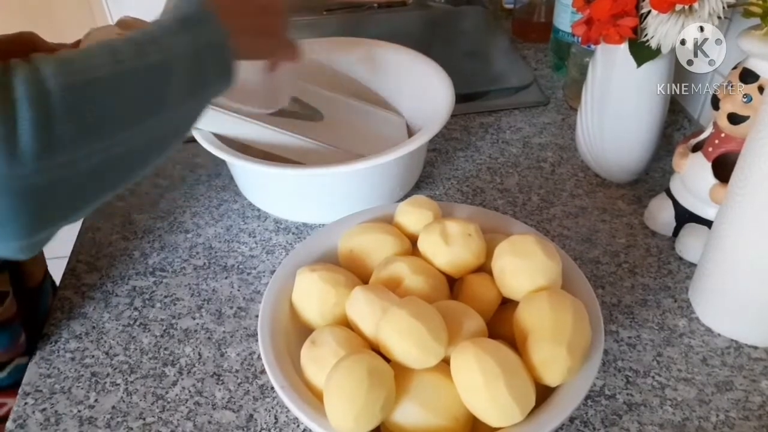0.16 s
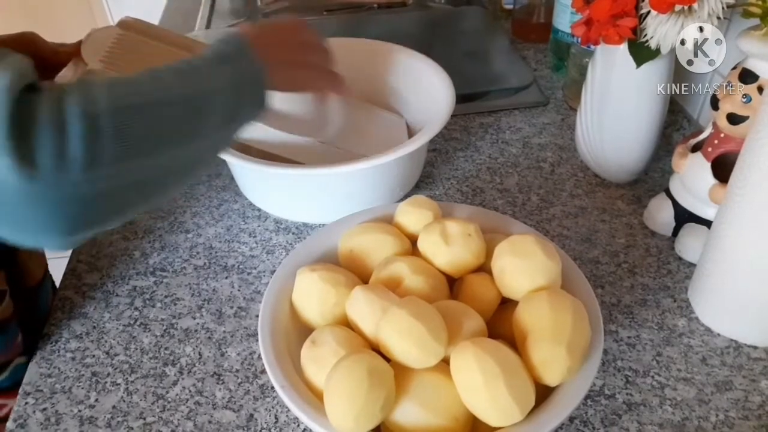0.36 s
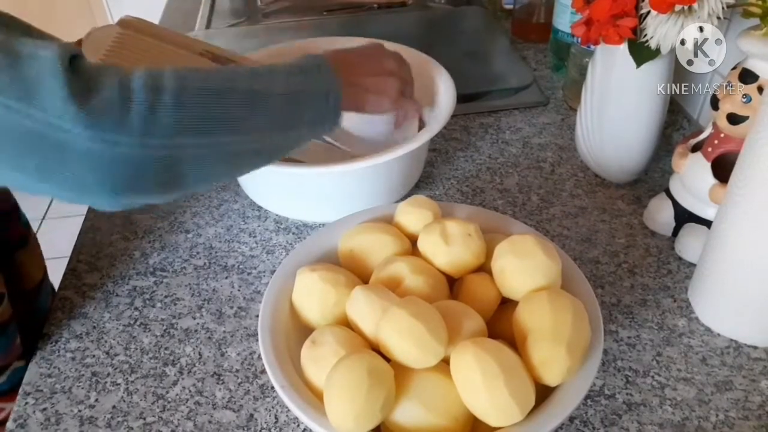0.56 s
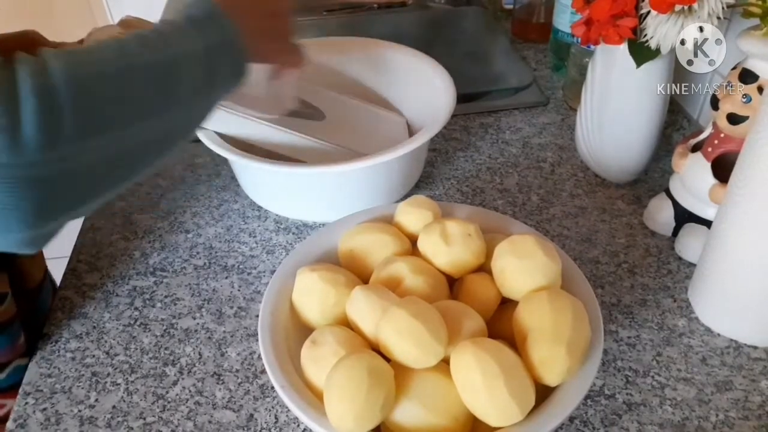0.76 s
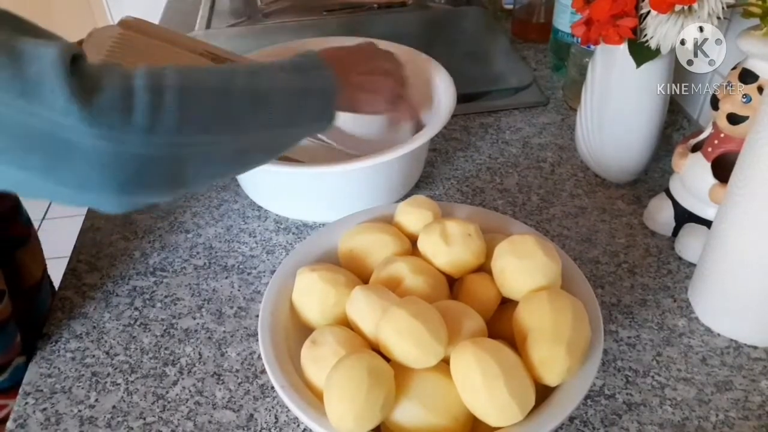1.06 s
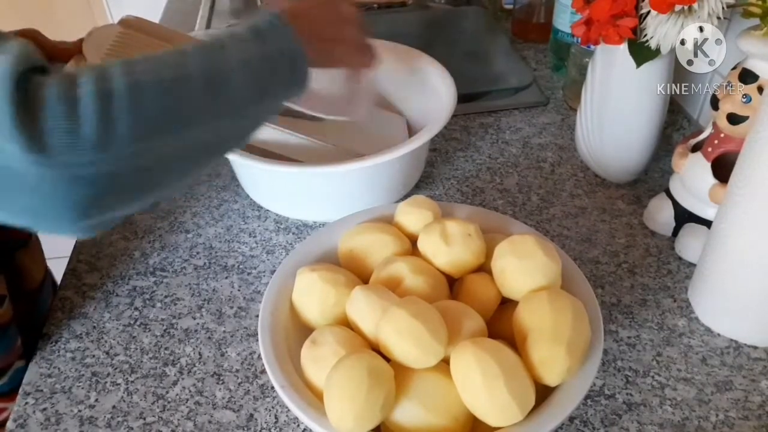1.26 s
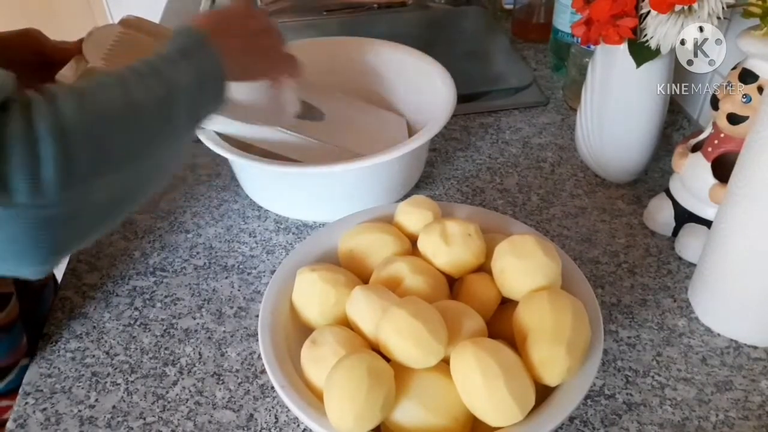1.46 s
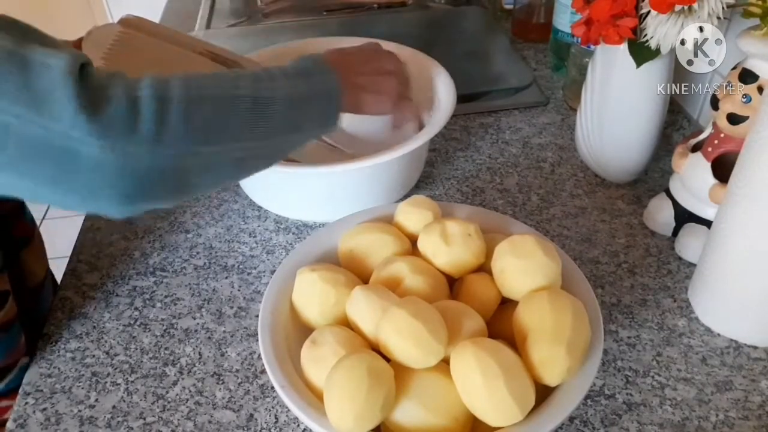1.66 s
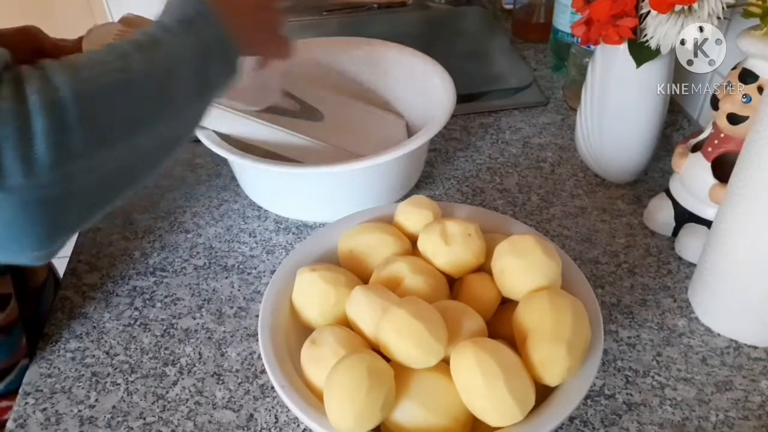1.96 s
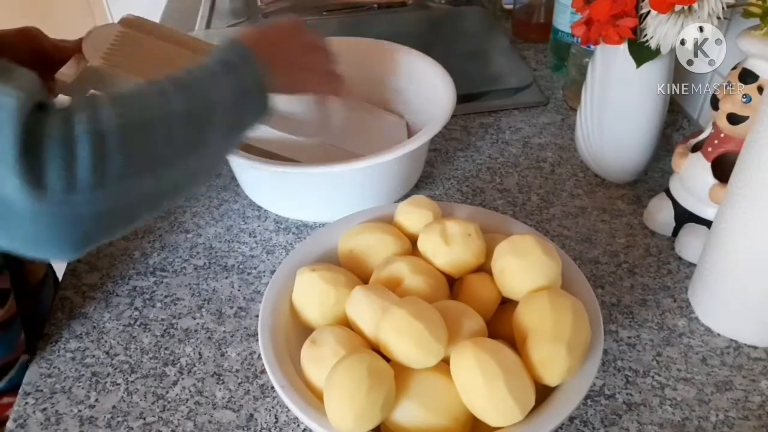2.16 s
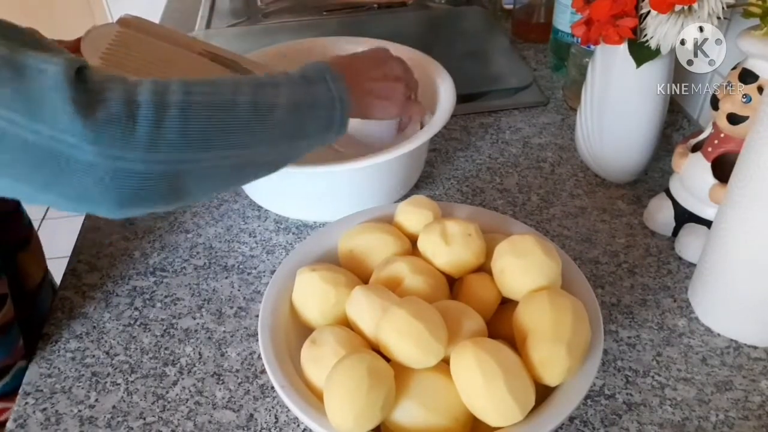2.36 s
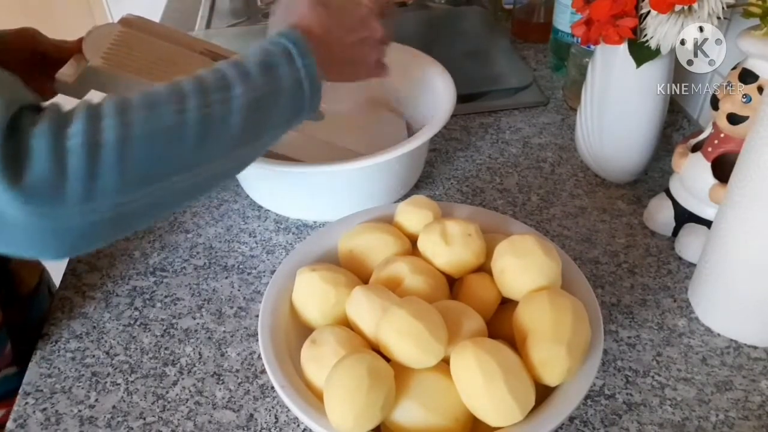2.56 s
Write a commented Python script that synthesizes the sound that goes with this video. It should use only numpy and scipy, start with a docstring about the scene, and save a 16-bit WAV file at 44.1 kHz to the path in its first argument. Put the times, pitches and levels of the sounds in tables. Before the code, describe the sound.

A potato is sliced on a wooden slicer in a small kitchen. Each of four strokes starts with a crisp crunch, hisses wetly and ends in a hollow knock. Soft low bumps and light rubs fall between, heard from nearby.

```python
"""A small kitchen: a potato is pushed four times over a wooden slicer resting in a plastic bowl.
On each stroke the blade bites with a crunch, the board judders, the wet slice hisses over the blade,
and the stop gives a hollow knock. Soft, low bumps boom briefly in the room. The potato is
drawn back with a light rub, the last time with a squeak. Faint room tone lies under it all."""
import sys
import numpy as np
from scipy import signal
from scipy.fft import rfft, irfft, next_fast_len
from scipy.io import wavfile
from scipy.ndimage import uniform_filter1d

SR = 44100
rng = np.random.default_rng(int(sys.argv[2]) if len(sys.argv) > 2 else 0)


def transcribe(signal):
    """Save signal, clipped to [-1, 1], as a 16-bit WAV file at the path in sys.argv[1]."""
    frames = np.atleast_2d(signal).T
    limited = np.clip(frames, -1, 1)
    pcm = np.round(limited * 32767).astype(np.int16)
    wavfile.write(sys.argv[1], SR, pcm)


N = 119070
T = np.arange(N) / SR
GRAINS_PER_S, SLIPS_PER_S = 9900, 1800  # fine crackle, coarser stick-slip


def amp(db):
    """Decibels to gain."""
    return 10 ** (np.asarray(db) / 20)


def unit(x):
    """x scaled to rms 1."""
    return x / np.sqrt(np.mean(x ** 2) + 1e-20)


def along(points, hz):
    """A curve of (frequency, value) points, read at hz on a log axis."""
    f, v = np.transpose(points)
    return np.interp(np.log(hz + 1), np.log(f + 1), v)


def filtered(x, response):
    """x through a complex frequency response."""
    size = 2 * next_fast_len(N)
    return irfft(rfft(x, size) * response(np.fft.rfftfreq(size, 1 / SR)), size)[..., :N]


def causal(db, hz):
    """The minimum-phase response with a gain of db at the frequencies hz."""
    cepstrum = irfft(np.log(amp(db)) * np.ones_like(hz))
    half = len(cepstrum) // 2
    cepstrum[1:half] *= 2
    cepstrum[half + 1:] = 0
    return np.exp(rfft(cepstrum))


def colour(x, eq):
    """x through an EQ curve, with make-up gain that holds the power of white noise."""
    rms_gain = np.sqrt(np.mean(amp(along(eq, np.linspace(0, SR / 2, N))) ** 2))
    return filtered(x, lambda hz: causal(along(eq, hz), hz)) / rms_gain


def resonate(x, peaks):
    """x through a resonator bank of alternating polarity that holds the power of white noise."""
    def response(f):
        bank = sum((-1) ** k * amp(db) * 1j * f * width / (hz * hz - f * f + 1j * f * width)
                   for k, (hz, width, db) in enumerate(peaks))
        return bank / np.sqrt(np.mean(abs(bank) ** 2))
    return filtered(x, response)


def grains(rate, spread_db):
    """Crackle: tiny random clicks of uneven size, rms 1."""
    clicks = (rng.random(N) < rate / SR) * np.sign(rng.standard_normal(N))
    return unit(clicks * amp(spread_db * (2 * rng.random(N) - 1)))


def gate(start, length, attack_s, release_s):
    """Attack, hold, exponential release."""
    attack = np.clip((T - start) / attack_s, 0, 1)
    return attack * np.exp(-np.maximum(T - start - length, 0) / release_s)


def arch(start, length, power):
    """Speed of the hand: it swells and falls over one movement."""
    return np.maximum(np.sin(np.pi * np.clip((T - start) / length, 0, 1)), 1e-9) ** power


def ring(start, modes, rise_s, spread_db=1):
    """Modes struck together, their balance a little different on each hit."""
    t = np.maximum(T - start, 0)[:, None][T < start + .5]
    hz, db, t60 = np.transpose(modes)
    decay = amp(db + spread_db * rng.standard_normal(len(hz)) - 60 * t / t60)
    attack = 1 - np.exp(-(t / rise_s) ** 2)
    partials = decay * np.sin(2 * np.pi * hz * t) * attack
    return np.pad(partials.sum(axis=1), (0, N - len(t)))


# reverb time of the kitchen (frequency [Hz], t60 [s])
ROOM_DECAY = [(100, 0.31), (300, 0.31), (800, 0.31), (2000, 0.3), (5000, 0.3), (14000, 0.22)]
# stereo image of the reverb (frequency [Hz], left-right correlation [0 to 1])
ROOM_IMAGE = [(100, 0.94), (200, 0.96), (350, 0.058), (600, .3), (1000, 0), (2500, 0), (12000, 0.11)]
def reflections(rise_s=0.0021):
    """The short tail off hard walls: near mono in the bass, wide in the treble."""
    hz, t, noise = signal.stft(rng.standard_normal((2, SR // 2)), SR, nperseg=256)
    width = np.arccos(np.clip(along(ROOM_IMAGE, hz), -1, 1))[:, None] / 2
    tail = noise * amp(-60 * t / along(ROOM_DECAY, hz)[:, None]) * (1 - np.exp(-t / rise_s))
    mid, side = signal.istft(tail * np.array([np.cos(width), np.sin(width)]), SR, nperseg=256)[1]
    return np.array([mid + side, mid - side]) / np.linalg.norm(mid + side)


def kitchen(x, wet_db, scatter=0, scatter_decay_s=0.0036, scatter_above_hz=2600):
    """Direct sound, treble scattered by bowl and counter, and the room's tail."""
    sides = np.array([[.5], [-.5]])
    pan_db, lead_s = -1.5, .00004  # left relative to right
    y = filtered(x, lambda f: amp(sides * pan_db) * np.exp(2j * np.pi * f * lead_s * sides))
    highpass = signal.butter(2, scatter_above_hz, 'high', fs=SR, output='sos')
    # the hand moves, so each stroke meets other reflections
    edges = [0] + [s + .2 for s, _, _ in KNOCKS[:-1]] + [N / SR]
    for start, end in zip(edges, edges[1:]):
        tail = amp(wet_db) * reflections()
        burst = rng.standard_normal(tail.shape) * np.exp(-T[:tail.shape[1]] / scatter_decay_s)
        early = signal.sosfilt(highpass, burst)
        tail += scatter * early / np.linalg.norm(early, axis=1, keepdims=True)
        first = int(start * SR)
        wet = signal.fftconvolve(x[None, first:int(end * SR)], tail, axes=1)[:, :N - first]
        y[:, first:first + wet.shape[1]] += wet
    return y / np.hypot(1, amp(wet_db))


# EQ of the room tone (frequency [Hz], relative level [dB])
ROOM_TONE_EQ = [(25, -7), (60, 1.5), (180, 0.5), (400, -4), (1000, -11), (3000, -16.5), (7000, -12.5),
                (15000, -10)]
def room_tone():
    """A faint, steady bed of low rumble and air."""
    return amp(-72.5) * kitchen(colour(rng.standard_normal(N), ROOM_TONE_EQ), wet_db=-7)


# a low ring dying away at the start, then soft, low bumps (time [s], level [dB])
BUMPS = [(0, -33), (0.363, -36.5), (0.536, -26.5), (.586, -37), (0.679, -43.5), (1.116, -24),
         (1.165, -32.5), (1.512, -39.5), (1.709, -28.5), (2.152, -28.5), (2.328, -26.5), (2.353, -36),
         (2.397, -29)]
# low ring of the room (frequency [Hz], level [dB], t60 [s])
ROOM_MODES = [(103.3, -4, 0.18), (172, -14, 0.081), (190.9, 0, 0.2), (230.3, -3.5, 0.12), (332, 1.5, 0.088),
              (383, -1.5, .1), (455, -7.5, .15), (603, -8, 0.13), (743.4, -16.5, 0.17)]
def low_bumps():
    """Soft, low bumps boom briefly in the room."""
    bumps = sum(amp(db) * ring(s, ROOM_MODES, rise_s=0.0023) for s, db in BUMPS)
    return kitchen(bumps, wet_db=-4)


# back strokes (time [s], length [s], level [dB])
BACK_STROKES = [(0, 0.032, -57), (0.077, 0.22, -67.5), (0.64, 0.35, -55), (1.869, 0.093, -84),
                (2.368, 0.043, -46.5)]
# EQ of the soft rub (frequency [Hz], relative level [dB])
RUB_EQ = [(200, 7), (1500, -1.5), (3000, -6.5), (5500, -7), (9000, -7.5), (15000, -13.5)]
def back_rubs():
    """The potato rubs lightly over the board on its way back."""
    swell = sum(amp(db) * arch(s, length, power=0.34) for s, length, db in BACK_STROKES)
    return kitchen(colour(swell * rng.standard_normal(N), RUB_EQ), wet_db=3.5)


# bites of the blade (time [s], crunch level [dB], snap level [dB], length [s])
BITES = [(0.2103, -30.5, -25, 0.0037), (0.2171, -19.5, -29, 0.0057), (.8085, -30, -32.5, 0.0024),
         (.821, -17, -29, 0.0025), (1.3943, -22.5, -24.5, 0.0044), (2.0154, -25, -29, 0.0065)]
# EQ of the full-bodied crunch (frequency [Hz], relative level [dB])
CRUNCH_EQ = [(100, -7), (500, 11), (1000, 0), (1700, 3.5), (2800, 7), (4500, -2), (7000, -7.5),
             (9000, -8.5), (12000, -8.5), (16000, -17)]
# EQ of the bright snap (frequency [Hz], relative level [dB])
SNAP_EQ = [(500, -22.5), (3000, -2.5), (6000, -6.5), (8700, 2.5), (11500, -5.5), (15500, -5)]
def blade_bites():
    """Crisp cells burst as the blade enters: a bright snap on top of a crunch."""
    crunch_env = sum(amp(db) * gate(s, length, attack_s=.0008, release_s=.003)
                     for s, db, _, length in BITES)
    crunch = colour(crunch_env * grains(GRAINS_PER_S, spread_db=3.5), CRUNCH_EQ)
    roomy_crunch = kitchen(crunch, wet_db=1, scatter=1.0)
    snap_env = sum(amp(db) * gate(s, length, attack_s=0.00033, release_s=0.0013)
                   for s, _, db, length in BITES)
    snap = colour(snap_env * grains(GRAINS_PER_S, spread_db=7.5), SNAP_EQ)
    return roomy_crunch + kitchen(snap, wet_db=-9, scatter=0.69)


# judders as each cut opens (time [s], length [s], level [dB])
JUDDERS = [(0.212, 0.05, -33), (0.817, 0.022, -27.5), (1.391, 0.035, -27.5), (2.018, 0.037, -28.5)]
# body of the wooden board (frequency [Hz], bandwidth [Hz], relative level [dB])
BOARD_BODY = [(52.1, 6.1, -9), (115.6, 13, 6.5), (198, 18, 8), (265.4, 27, -1.5), (342, 42, 4),
              (448, 50, -5), (558, 40, -0.5), (624, 59, 3.5), (759, 40, -3), (1154, 99, -1.5),
              (1342, 89, -13), (2430, 430, -9), (2850, 460, -10), (3670, 400, -15.5)]
# EQ of the tearing potato (frequency [Hz], relative level [dB])
TEAR_EQ = [(200, -3.5), (1000, 0.5), (3000, -2.5), (5000, -7), (9000, -12.5), (15000, -25.5)]
def board_judders():
    """The potato sticks, slips and tears against the blade, shaking the board."""
    force = sum(amp(db) * gate(s, length, attack_s=0.0034, release_s=0.018) for s, length, db in JUDDERS)
    tearing = amp(-8) * colour(force * grains(GRAINS_PER_S, spread_db=12), TEAR_EQ)
    judder = resonate(force * grains(SLIPS_PER_S, spread_db=4.5), BOARD_BODY)
    return kitchen(judder + tearing, wet_db=-2)


# passes of the slice over the blade (time [s], length [s], hiss level [dB], rumble level [dB])
SLIDES = [(0.325, 0.14, -37, -41.5), (0.924, 0.11, -36.5, -41), (1.471, .15, -45.5, -40),
          (2.12, 0.14, -37.5, -37.5)]
# EQ of the wet hiss (frequency [Hz], relative level [dB])
HISS_EQ = [(100, -17), (600, -0.5), (900, 1), (1500, 7), (2200, 2), (3600, 3), (5000, 0.5), (7000, -1),
           (9200, 1), (11000, 0.5), (15500, -1)]
# low resonances of the room (frequency [Hz], bandwidth [Hz], relative level [dB])
RUMBLE_RESONANCES = [(52.7, 9.1, -39), (115.8, 9.1, 6.5), (179.5, 21, 3.5), (264.6, 75, -3), (350, 81, -1),
                     (407.8, 45, -3), (491.4, 32, -8), (593.4, 90, -4), (780, 52, -21.5)]
def slice_slides(drag_db=-45.5):
    """The wet slice hisses across the blade, over a low rumble in the room."""
    # steady friction from the judder until just before the knock
    drag = sum(gate(judder[0], knock[0] - judder[0] - .05, attack_s=0.027, release_s=.01)
               for judder, knock in zip(JUDDERS, KNOCKS))
    hiss_env = sum(amp(db) * arch(s, length, power=0.59) for s, length, db, _ in SLIDES)
    rumble_env = sum(amp(db) * arch(s, length, power=.4) for s, length, _, db in SLIDES)
    hiss = colour((amp(drag_db) * drag + hiss_env) * grains(GRAINS_PER_S, spread_db=10.5), HISS_EQ)
    rumble = resonate(rumble_env * grains(SLIPS_PER_S, spread_db=5.5), RUMBLE_RESONANCES)
    return kitchen(hiss + rumble, wet_db=4)


# knocks that end the strokes (time [s], clack level [dB], thump level [dB])
KNOCKS = [(.5112, -16.5, -13), (1.0991, -20.5, -21.5), (1.688, -20, -13), (2.3141, -21.5, -18)]
# high, woody ring of the slicer (frequency [Hz], level [dB], t60 [s])
CLACK_MODES = [(1646, -7, 0.056), (1738, -1.5, 0.033), (1968, 0, 0.024), (2014, 0, 0.019),
               (2148, 0.5, 0.023), (2350, -18.5, 0.15), (2690, -11.5, 0.051), (3050, -7.5, 0.021),
               (3580, -11, 0.01), (3640, -9, 0.013)]
# low, hollow ring of the slicer (frequency [Hz], level [dB], t60 [s])
THUMP_MODES = [(343, 8, 0.034), (303, -6.5, 0.076), (372, -4, 0.03), (460, -16.5, 0.046), (542, -15, 0.12),
               (739, -19.5, .05)]
# EQ of the impact transient (frequency [Hz], relative level [dB])
CRACK_EQ = [(200, 1.5), (900, 10), (2000, 7.5), (3500, 5), (4400, -3.5), (7500, -4.5), (11000, -6.5),
            (16000, -11.5)]
def stop_knocks(crack_over_clack_db=18):
    """The stroke hits its stop: a crack, a wooden clack and a slower hollow thump."""
    clack = sum(amp(db) * ring(s, CLACK_MODES, rise_s=0.0008) for s, db, _ in KNOCKS)
    thump = sum(amp(db) * ring(s, THUMP_MODES, rise_s=0.0039) for s, _, db in KNOCKS)
    impacts = np.zeros(N)
    for s, db, _ in KNOCKS:
        impacts[round(s * SR)] = amp(db + crack_over_clack_db)
    return (kitchen(clack, wet_db=-2.5, scatter=0.42)
            + kitchen(colour(impacts, CRACK_EQ), wet_db=10, scatter=4.06)
            + kitchen(thump, wet_db=-6))


# chirps that make up the squeak (time [s], length [s], pitch [Hz], level [dB])
CHIRPS = [(2.3855, 0.0064, 1671, -34.5), (2.398, 0.015, 1724, -35), (2.4175, 0.0017, 1880, -28)]
# EQ of the squeak's rasp (frequency [Hz], relative level [dB])
RASP_EQ = [(200, 5), (600, -0.5), (850, 16.5), (1200, -3.5), (2100, 11.5), (2800, -2), (3700, -4),
           (5000, -15), (15000, -39)]
def skin_squeak(wobble=0.0507, rasp_db=-2):
    """Wet skin sticks and slips on the board: brief, wavering tones with a raspy edge."""
    squeak = np.zeros(N)
    for s, length, hz, db in CHIRPS:
        pitch = hz * (1 + wobble * unit(uniform_filter1d(rng.standard_normal(N), size=60)))
        tone = np.sin(2 * np.pi * np.cumsum(pitch) / SR)
        rasp = amp(rasp_db) * colour(rng.standard_normal(N), RASP_EQ)
        squeak += amp(db) * gate(s, length, attack_s=0.0019, release_s=0.0021) * (tone + rasp)
    return kitchen(squeak, wet_db=-7)


def scene():
    """The stereo mix: four slicing strokes and the handling around them, over room tone."""
    bed = room_tone()
    strokes = blade_bites() + board_judders() + slice_slides() + stop_knocks()
    handling = low_bumps() + back_rubs() + skin_squeak()
    return bed + strokes + handling


# tonal balance of the microphone pair (frequency [Hz], left minus right level [dB])
MIC_BALANCE = [(100, -3), (300, -5), (550, -1), (1200, -1.5), (2200, 0), (5000, 0), (14000, -2)]
def record(dry, low_cut_hz=42, high_cut_hz=15700):
    """Two microphones, each with its own colour; the deepest bass and the very top are cut."""
    y = filtered(dry, lambda hz: np.array([causal(s * along(MIC_BALANCE, hz), hz) for s in (.5, -.5)]))
    y = signal.sosfilt(signal.butter(4, low_cut_hz, 'high', fs=SR, output='sos'), y)
    return filtered(y, lambda hz: 1 / np.hypot(1, (hz / high_cut_hz) ** 70))


dry = scene()
out = record(dry)
transcribe(out)
```